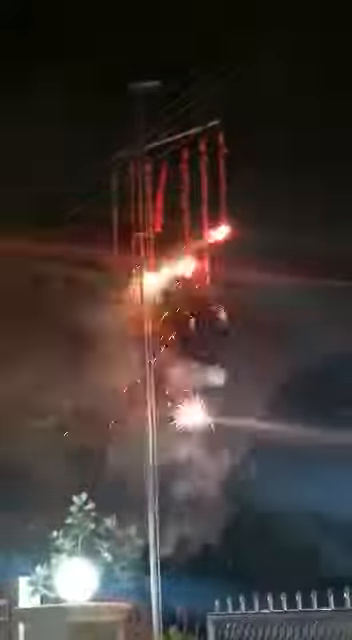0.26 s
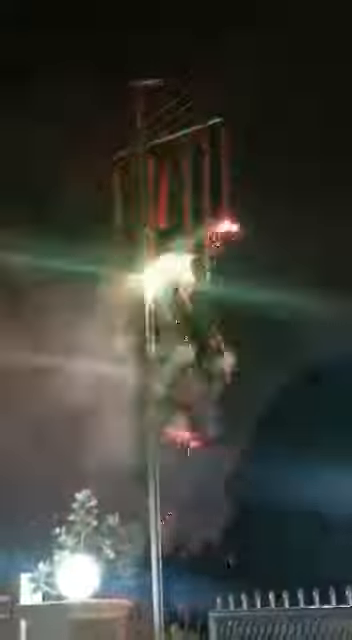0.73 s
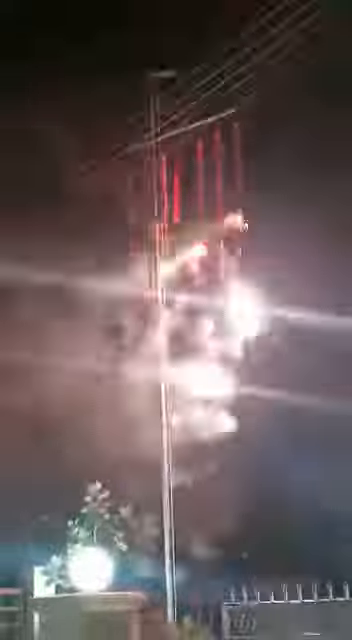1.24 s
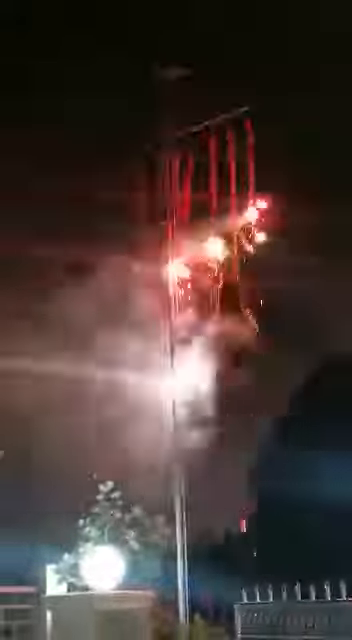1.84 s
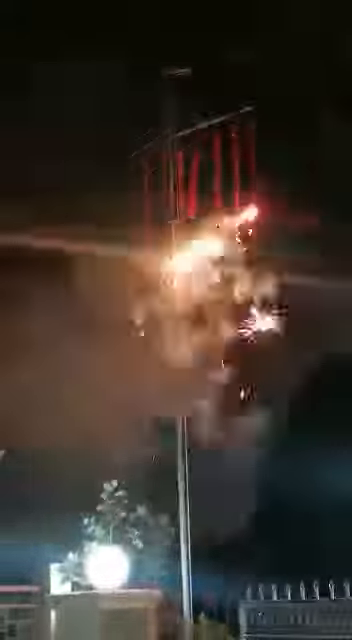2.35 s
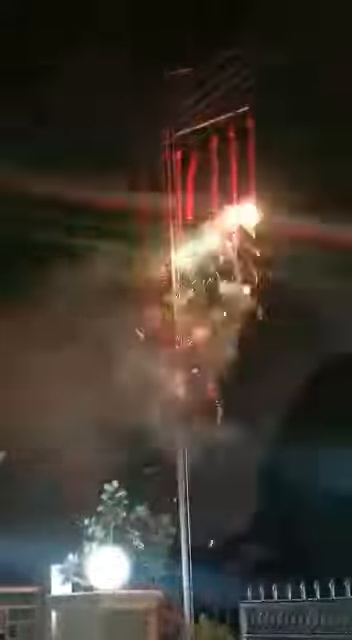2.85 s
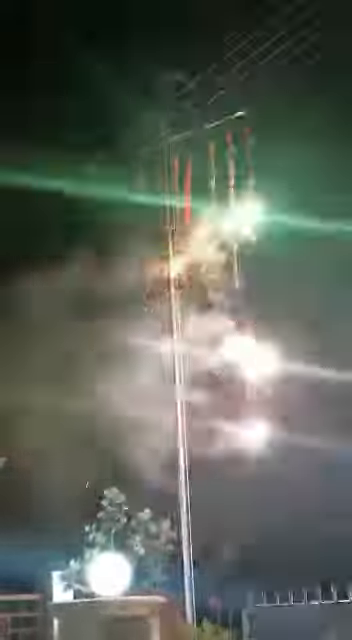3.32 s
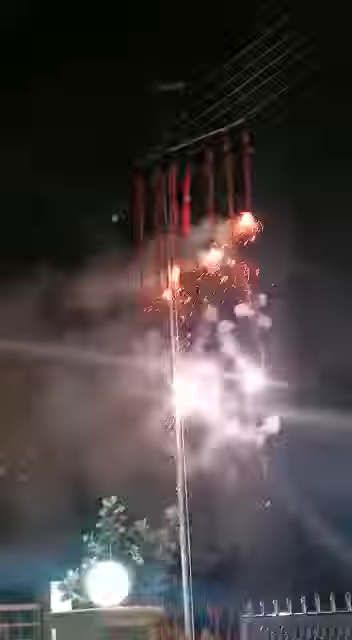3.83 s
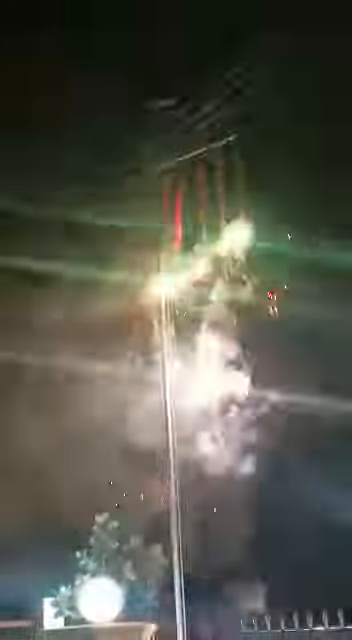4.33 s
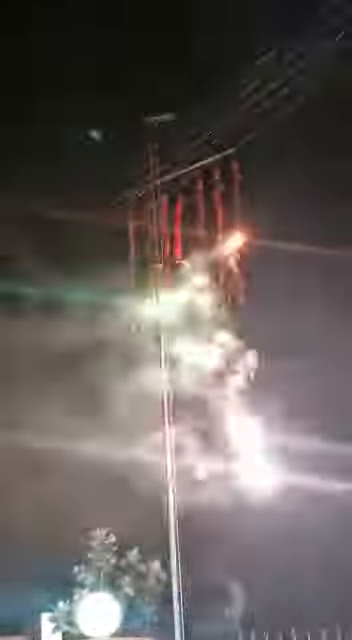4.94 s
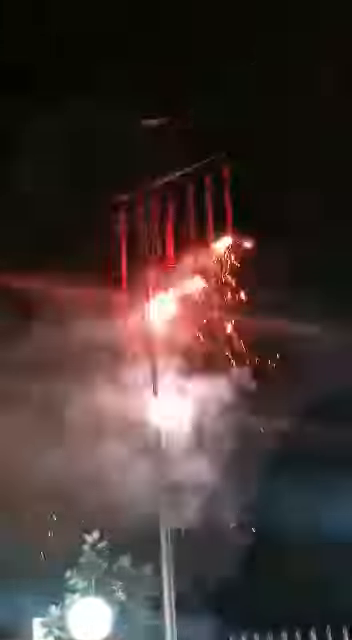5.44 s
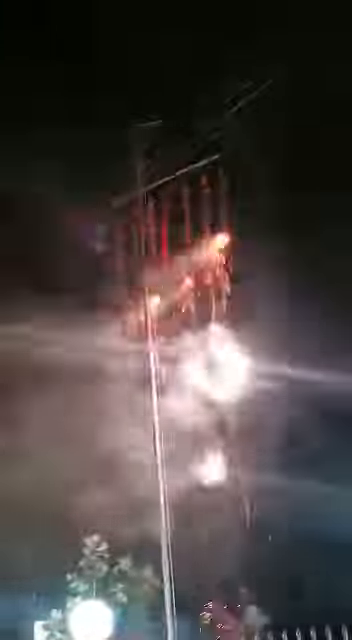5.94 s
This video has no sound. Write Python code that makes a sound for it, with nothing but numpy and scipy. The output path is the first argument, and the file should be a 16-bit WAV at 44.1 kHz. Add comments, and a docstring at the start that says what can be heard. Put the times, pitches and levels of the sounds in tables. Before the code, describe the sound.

A dense, irregular barrage of firecrackers crackles outdoors from the start, big bangs mixed with quick bursts of small ones and four deep pops. One soft, hollow boom sounds far off near the beginning. The blasts overload the phone microphone into harsh cracks and thumps, trailed by short street echoes. Two thirds of the way through, everything drops to silence for a third of a second before the banging resumes.

```python
"""A street at night, where strings of firecrackers burn down from a pole: big bangs amid runs of small ones.
Each blast is a shock wave that overloads a phone's microphones into a crack and a thump. It returns by
specular reflection from the ground and walls, and by scattering from the houses as reverberation.
Longer blast waves land as four deep pops, and one distant boom rolls in early on.
The sound cuts out once for a third of a second."""
import sys
import numpy as np
from scipy import signal
from scipy.fft import rfft, irfft
from scipy.io import wavfile
from scipy.ndimage import uniform_filter1d, minimum_filter1d

SR = 44100
rng = np.random.default_rng(int(sys.argv[2]) if len(sys.argv) > 2 else 0)


def inscribe(sig):
    """Save sig as 16-bit PCM at rate SR to the path in sys.argv[1].

    A 1-D sig is mono; a 2-D sig holds one channel per row.
    Samples are clipped to [-1, 1] before scaling.
    """
    pcm = np.round(np.clip(np.atleast_2d(sig).T, -1, 1) * 32767)
    wavfile.write(sys.argv[1], SR, pcm.astype(np.int16))


N = 272538

# Big firecrackers that stand out of the crackle: start_s, echo_db, thump_db
BIG_CRACKERS = [(0.0005, -14.5, -27), (0.0343, -14, -17), (0.073, -21.5, -19.5), (0.131, -27, -16),
                (0.329, -19.5, -25.5), (0.401, -16, -32), (0.6046, -16.5, -16), (0.632, -16, -32),
                (0.71, -19, -19.5), (0.753, -15.5, -21), (0.8302, -15.5, -16.5), (0.9133, -17.5, -18),
                (1.016, -16.5, -14), (1.1233, -13.5, -19), (1.2178, -13, -12), (1.352, -15.5, -16.5),
                (1.3918, -14, -13.5), (1.467, -19.5, -19), (1.613, -17, -20), (1.6976, -16.5, -29),
                (1.7263, -17, -16), (1.808, -15, -17), (1.841, -14.5, -27), (1.942, -18, -22),
                (2.022, -16, -21), (2.079, -12.5, -17), (2.3942, -14.5, -15), (2.5473, -27, -32),
                (2.6133, -16.5, -26), (2.8196, -17.5, -15), (2.8617, -16.5, -17.5), (2.8966, -12.5, -16),
                (2.9797, -11.5, -16), (3.1775, -16, -11), (3.2483, -19, -18), (3.314, -13.5, -27),
                (3.4432, -15.5, -17), (3.4887, -19.5, -15), (3.5836, -27, -13), (3.715, -13, -39),
                (3.7849, -13.5, -16.5), (3.9379, -18.5, -23), (4.009, -15.5, -23), (4.447, -11, -26),
                (4.466, -16, -9), (4.7071, -14.5, -11), (4.7992, -20.5, -14.5), (4.844, -20, -15),
                (4.9304, -23, -16), (4.9992, -15, -22), (5.065, -13.5, -16), (5.1038, -17.5, -14.5),
                (5.2802, -33, -20), (5.4427, -18.5, -16.5), (5.6354, -20.5, -14.5), (5.7582, -23.5, -14),
                (5.8558, -20, -17.5), (5.9619, -17, -23), (6.1053, -18.5, -11)]
def big_bangs(pause_s=0.23):
    """Impulsive sources: the columns of the big bangs, and how rested each is (1 after a full pause)."""
    bangs = np.transpose(BIG_CRACKERS)
    gaps_s = np.diff(bangs[0], prepend=0)
    return bangs, np.clip(gaps_s / pause_s, 0, 1)


# Runs of small firecrackers along the fuse: start_s, end_s, echo_db, thump_db
SMALL_CRACKER_RUNS = [(0.04, 0.24, -18.5, -21.5), (0.85, 1.22, -24.5, -27.5), (2.09, 2.37, -21, -21.5),
                      (2.42, 2.62, -22, -23.5), (2.66, 2.79, -19.5, -22), (2.99, 3.13, -19, -20.5),
                      (3.179, 3.37, -24.5, -23.5), (3.45, 3.67, -20.5, -23.5), (3.79, 4.08, -23, -23),
                      (4.49, 4.55, -20.5, -15.5), (4.73, 4.98, -22.5, -21), (5.07, 5.35, -22, -19),
                      (5.45, 5.58, -24, -29), (5.64, 5.8, -20, -19), (5.91, 6.18, -21.5, -21)]
def volleys(rate_hz=36, jitter_gaps=.8, scatter_db=5.5):
    """Jittered pulse train: an uneven fuse fires unequal charges. Gives start_s, echo_db, thump_db."""
    count = int(rate_hz * N / SR)
    late, charge = rng.uniform(-1, 1, (count, 2)).T
    times = (np.arange(count) + .5 + jitter_gaps * late / 2) / rate_hz
    db = np.full((2, count), -120.)  # inaudible between runs
    for start, end, echo_db, thump_db in SMALL_CRACKER_RUNS:
        db = np.where((times >= start) & (times < end), [[echo_db], [thump_db]], db)
    return np.array([times, *(db + scatter_db * charge)])


# Spectrum of an overloaded microphone's crack: frequency_hz, gain_db
CRACK_SPECTRUM = [(200, -4), (1800, 16.5), (4200, 4), (6300, 13), (7600, -3.5), (10000, -12),
                  (15000, -22.5)]
def cracks(times, db, height, fade_s=0.0009, gain_db=4, front_gain=3, bounce_db=-2):
    """Shock excitation: the direct front and its ground bounce set each microphone port ringing briefly."""
    shocks = strikes(times, undb(db))
    bounces = strikes(times + bounce_lag(height), undb(db + bounce_db))
    decay = np.exp(-np.arange(SR // 50) / SR / fade_s)
    ringing = ring(shocks + bounces, decay) * rng.standard_normal((2, N))
    return undb(gain_db) * colour(front_gain * right_first(shocks) + ringing, CRACK_SPECTRUM)


def thumps(times, db, height, sag_s=.006, suction=0.13, suction_s=0.00051, gain_db=2.5, unlike_db=9.0):
    """Overload: pressure pins each microphone until about the ground bounce, then swings to suction."""
    t = np.arange(SR // 50) / SR
    pressure = np.zeros((2, N + len(t)))
    starts = np.clip(times * SR, 0, N).astype(int)
    draws = rng.standard_normal((len(times), 3))
    for start, size, lag_s, luck in zip(starts, undb(db + gain_db), bounce_lag(height), draws):
        held_s = lag_s * np.exp(.17 * luck[:2, None])
        swing = -suction * np.exp(-np.abs(t - held_s) / suction_s)
        pulse = np.where(t < held_s, np.exp(-t / sag_s), swing)
        share = undb(unlike_db * (luck[2] - 0.77) * np.array([[1], [-1]]))  # the ports overload unequally
        pressure[:, start:start + len(t)] += size * share / share.mean() * pulse
    return butter(butter(pressure[:, :N], 22, "high", order=1), 2500, "low")


# Longer blast waves: start_s, level_db
LONG_BLASTS = [(0.6074, -12), (3.2367, -8.5), (3.586, -10.5), (3.9516, -6.5)]
def pops(length_s=0.0012):
    """A longer N-wave has a lower spectrum: with rounded edges it is a deep pop, alike left and right."""
    times, db = np.transpose(LONG_BLASTS)
    return butter(ring(strikes(times, undb(db)), n_wave(length_s)), 1500, "low")


def reflections(times, db, height, ground_db=1.5, wall_db=5.5, wall_lag_s=.011):
    """Specular reflection: ground and walls return clean N-waves; height shifts the two nearest paths."""
    ground_luck, wall_luck = undb(2.0 * np.clip(rng.standard_normal((len(times), 2)).T, -2, 1.3))
    bounces = strikes(times + bounce_lag(height), undb(db + ground_db) * ground_luck)
    ground = ring(bounces, n_wave(0.00052))
    near_wall = strikes(times + wall_lag_s - 0.00059 * height, undb(db + wall_db) * wall_luck)
    walls = ring(near_wall + slaps(times, db), n_wave(0.00053))
    return right_first(butter(ground + walls, 5100, "low", order=3))


def bounce_lag(height):
    """Path difference: seconds the ground bounce trails the blast, for heights -1 to 1 on the string."""
    return .0036 + .0007 * height


def slaps(times, db, walls=2, near_s=.012, far_s=.075, gain_db=2.5, scatter_db=2.5):
    """Slap echo: hard walls return each bang at lags and strengths that differ from burst to burst."""
    distance, luck = rng.random((len(times), 2, walls)).transpose(1, 2, 0)
    arrivals = times + near_s + (far_s - near_s) * distance
    sizes = undb(db + gain_db - scatter_db * np.log(np.maximum(luck, np.exp(-3))))
    return strikes(arrivals.ravel(), sizes.ravel())


# Spectrum of the street's echoes at the microphones: frequency_hz, gain_db
ECHO_SPECTRUM = [(40, -3.5), (120, -6), (300, -5), (700, -6), (1250, -2.5), (1750, 1), (2700, -1),
                 (4200, -11), (5700, -9), (6400, -10.5), (7500, -4), (8050, -11), (8500, -19),
                 (9400, -23.5), (10100, -32), (15000, -38.5)]
def reverberation(times, db, echoes_per_s=1500, scatter_db=2, low_hz=600, split_hz=3100):
    """Scattering: small echoes from fences and house fronts merge into a wash; the midrange swells last."""
    arrives = rng.random((2, N)) < echoes_per_s / SR
    sizes = undb(scatter_db * np.clip(rng.standard_normal((2, N)), -2, 1.5))
    echoes = arrives * sizes * rng.choice([-1, 1], (2, N))
    field = spread(.55 * echoes / echoes.std() + .83 * rng.standard_normal((2, N)))
    below = butter(field, split_hz, "low", order=3)
    bass = butter(below, low_hz, "low", order=3)
    body = butter(below, low_hz, "high", order=3)
    treble = butter(field, split_hz, "high", order=3)
    bass *= echo_envelope(times, db, build_s=0.0012, near_s=0.036, far_s=0.041, far_share=0.67)
    body *= echo_envelope(times, db, build_s=0.016, near_s=0.044, far_s=0.049, far_share=0.83)
    treble *= echo_envelope(times, db, build_s=0.0019, near_s=0.051, far_s=0.048, far_share=0.87)
    return undb(-2.5) * colour(bass + body + treble, ECHO_SPECTRUM)


def echo_envelope(times, db, build_s, near_s, far_s, far_share):
    """Incoherent echoes add in power, which builds, then decays exponentially from near and far fronts."""
    t = np.arange(SR) / SR
    power = (1 - np.exp(-t / build_s)) * (np.exp(-t / near_s) + far_share * np.exp(-t / far_s))
    total_power = ring(strikes(times, undb(db) ** 2), power)
    return np.sqrt(np.maximum(total_power, 0))


# Likeness of the echoes at the two microphones: frequency_hz, correlation
ECHO_COHERENCE = [(60, -0.021), (250, 0.17), (600, 0.6), (1300, 0.85), (2200, 0.27), (3500, -0.061),
                  (8000, -0.16)]
def spread(pair):
    """Partial coherence: two independent signals mix as mid and side into a correlated left and right."""
    alike = np.clip(per_bin(ECHO_COHERENCE), -1, 1)
    weights = np.sqrt([(1 + alike) / 2, (1 - alike) / 2])
    mid, side = irfft(rfft(pair, 2 * N) * weights)[:, :N]
    return np.array([mid + side, mid - side])


def far_boom(start_s=.467, fade_s=0.087, level_db=-28, hollow_hz=393, width_hz=55, hollow_db=-3):
    """Resonance in a low band of decaying noise: one distant, hollow boom, alike at both microphones."""
    age = np.arange(N) / SR - start_s
    rumble = butter(butter(rng.standard_normal(N), 150, "high", order=3), 520, "low", order=4)
    hollow = signal.lfilter(*signal.iirpeak(hollow_hz, hollow_hz / width_hz, SR), rumble)
    boom = rumble + undb(hollow_db) * hollow
    return undb(level_db) * boom / boom.std() * (age > 0) * np.exp(-np.abs(age) / fade_s)


def n_wave(length_s):
    """The N-wave of a blast: a jump in pressure, a straight fall to suction, a jump back."""
    n = np.arange(int(length_s * SR) + 2)
    return (1 - 2 * n / (length_s * SR)) * np.clip(length_s * SR - n, 0, 1)


def right_first(wave, lag_samples=4):
    """Time difference of arrival: a wave reaches the right port before the left."""
    return np.array([np.roll(wave, lag_samples), wave])


def strikes(times, sizes):
    """Impulse train: one impulse per event."""
    return np.bincount(np.clip(times * SR, 0, N).astype(int), sizes, N + 1)[:N]


def ring(x, shape):
    """Convolution: every impulse of x starts the given shape."""
    return signal.fftconvolve(x, shape)[:N]


def undb(db):
    """Decibels to amplitude ratio."""
    return 10 ** (np.asarray(db) / 20)


def per_bin(points):
    """Log-frequency interpolation of (frequency_hz, value) points, one value per bin."""
    hz, value = np.transpose(points)
    return np.interp(np.log(np.arange(N + 1) * SR / (2 * N) + 1), np.log(hz), value)


def colour(x, points):
    """Minimum-phase filter shaped by (frequency_hz, gain_db) points; white noise keeps its power."""
    gain = undb(per_bin(points))
    cepstrum = irfft(np.log(gain / np.sqrt(np.mean(gain ** 2))))
    cepstrum[1:N] *= 2  # folding the cepstrum makes the filter causal
    cepstrum[N + 1:] = 0
    return irfft(rfft(x, 2 * N) * np.exp(rfft(cepstrum)))[..., :N]


def butter(x, hz, kind, order=2):
    """Maximally flat low-pass or high-pass."""
    return signal.sosfilt(signal.butter(order, min(hz, SR / 2 - 1), kind, fs=SR, output="sos"), x)


def scene(fresh_db=6, thump_share=0.28):
    """Superposition: direct blasts, their echoes, the pops and the distant boom add in pressure."""
    big, rested = big_bangs()
    small = volleys()
    times, echo_db, thump_db = np.hstack([big, small])
    height = rng.uniform(-0.96, 1, len(times))
    # a big bang that follows a pause cracks harder than one inside a volley
    rested = np.r_[rested, np.zeros(small.shape[1])]
    crack_db = echo_db + thump_share * (thump_db - echo_db) + fresh_db * (rested - .5)
    direct = cracks(times, crack_db, height) + thumps(times, thump_db, height)
    echoes = reflections(times, echo_db, height) + reverberation(times, echo_db)
    return direct + echoes + pops() + far_boom()


# Sensitivity of the left microphone over the right: frequency_hz, difference_db
MICROPHONE_MISMATCH = [(25, 3), (60, 6.5), (350, 4.5), (700, 2), (1400, 2.5), (2200, 5.5), (3600, 0.5),
                       (5500, 2.5), (7200, 4.5), (8500, 13.5), (11000, 4), (15000, 8)]
def record(dry, ceiling=0.47, hold_s=0.0016, cutout_s=(4.085, 4.4468), top_hz=15200):
    """Transduction: two unlike microphones, a fast peak limiter, a short cut-out and a steep low-pass."""
    tilt = undb(np.outer([1, -1], per_bin(MICROPHONE_MISMATCH)) / 2)
    heard = irfft(rfft(dry, 2 * N) * tilt)[:, :N]
    hold = int(hold_s * SR) + 1
    needed_gain = ceiling / np.maximum(np.abs(heard), ceiling)
    limited = heard * uniform_filter1d(minimum_filter1d(needed_gain, hold), hold)
    t = np.arange(N) / SR
    live = (t < cutout_s[0]) | (t > cutout_s[1])
    return signal.sosfilt(signal.ellip(8, .2, 70, top_hz, fs=SR, output="sos"), limited * live)


dry = scene()
out = record(dry)
inscribe(out)
```